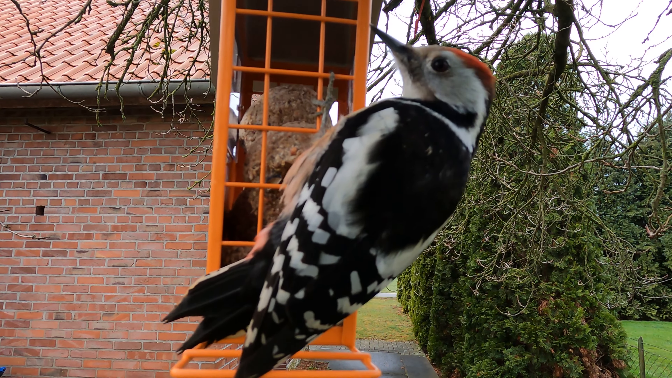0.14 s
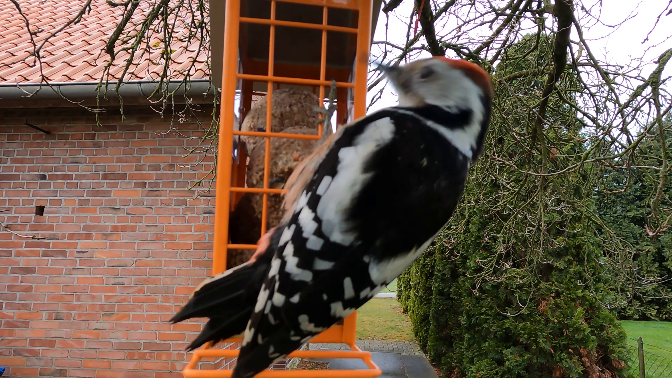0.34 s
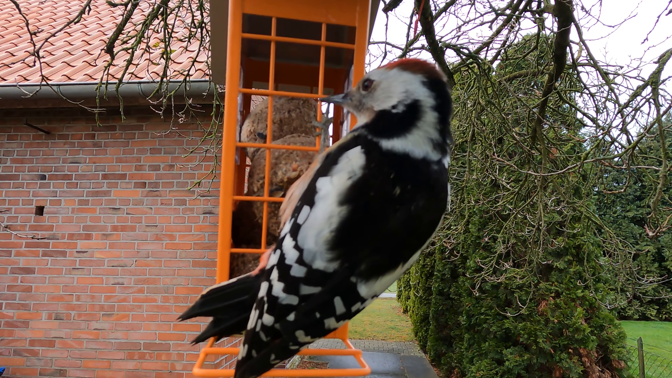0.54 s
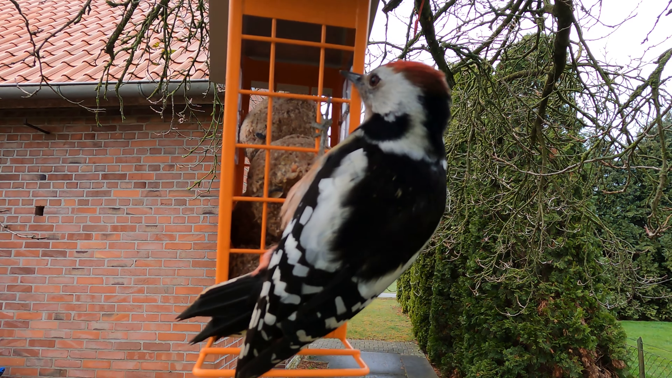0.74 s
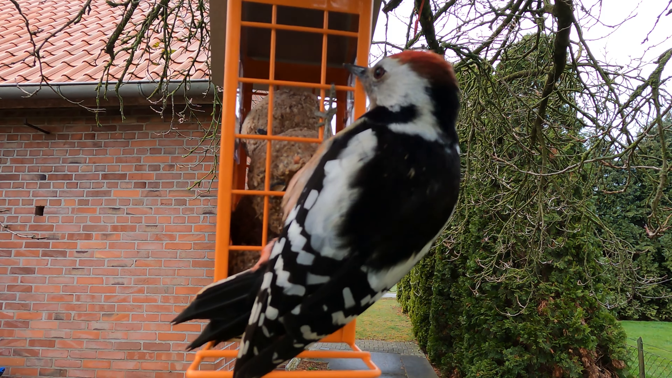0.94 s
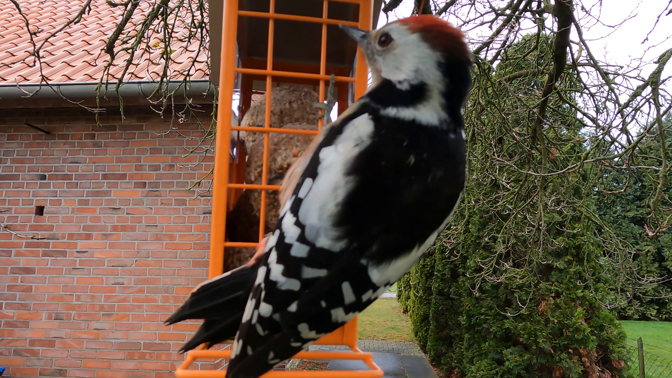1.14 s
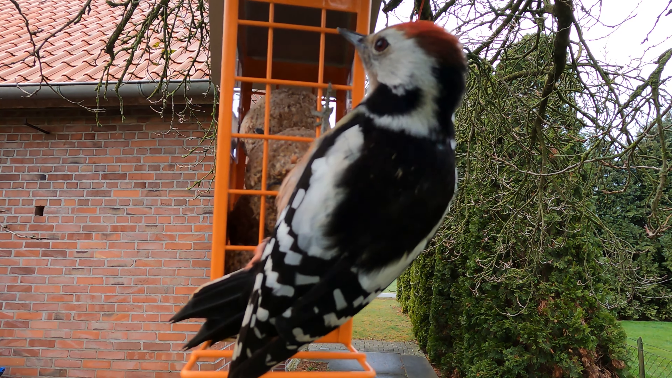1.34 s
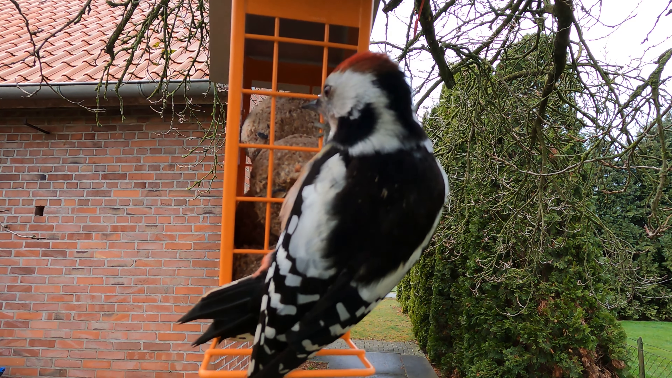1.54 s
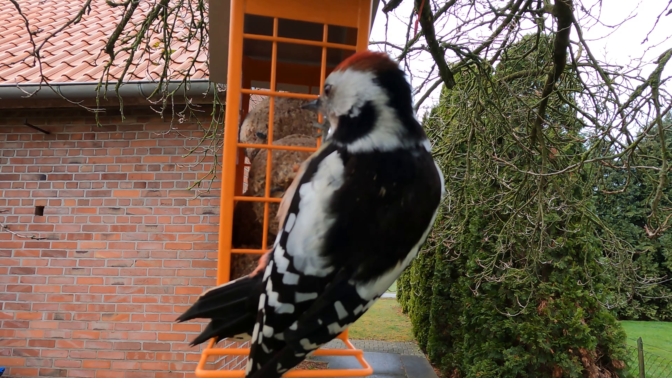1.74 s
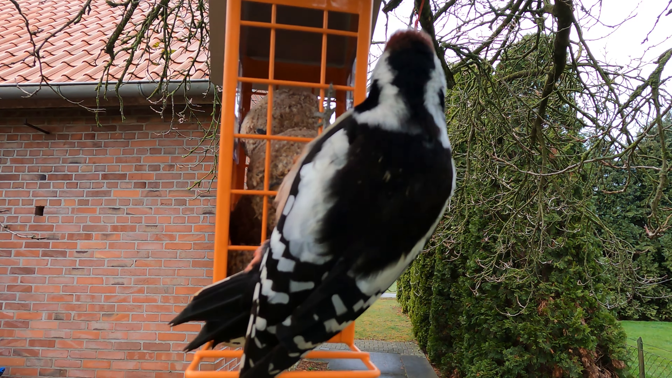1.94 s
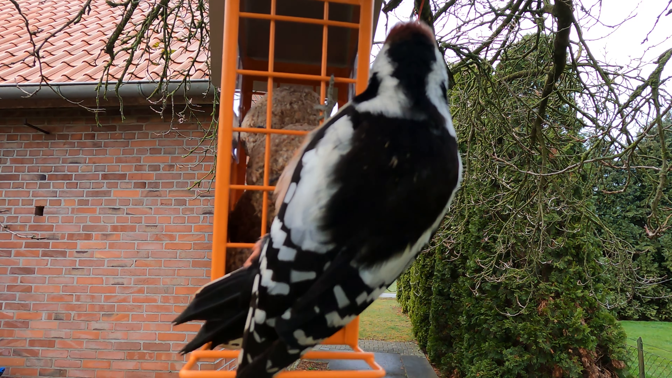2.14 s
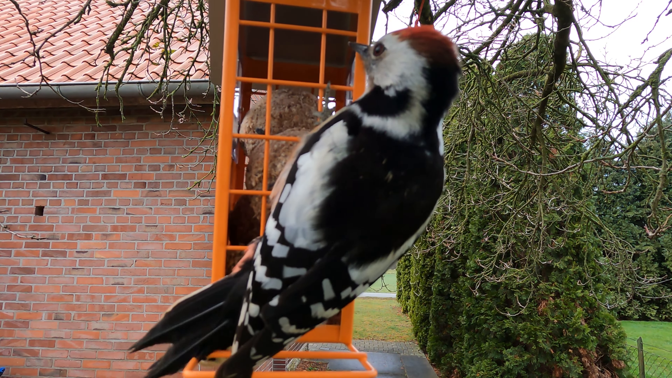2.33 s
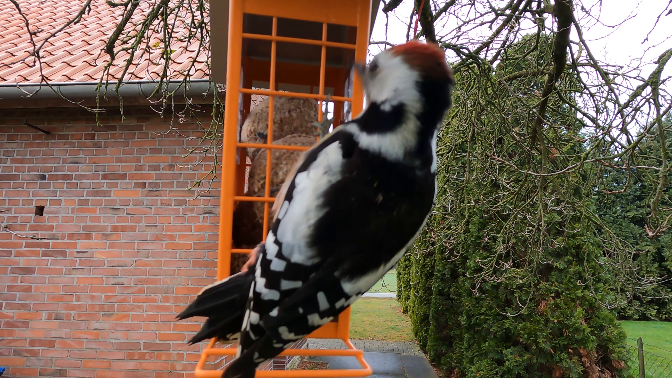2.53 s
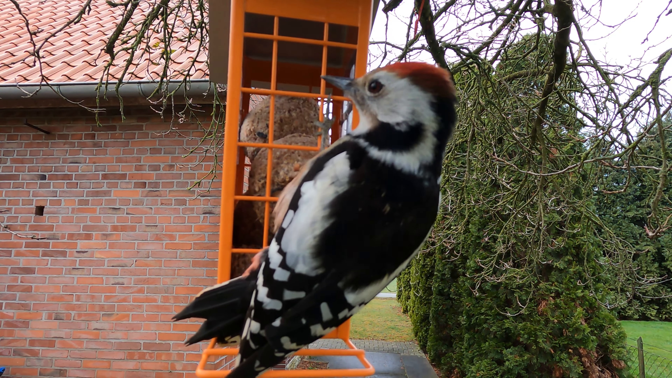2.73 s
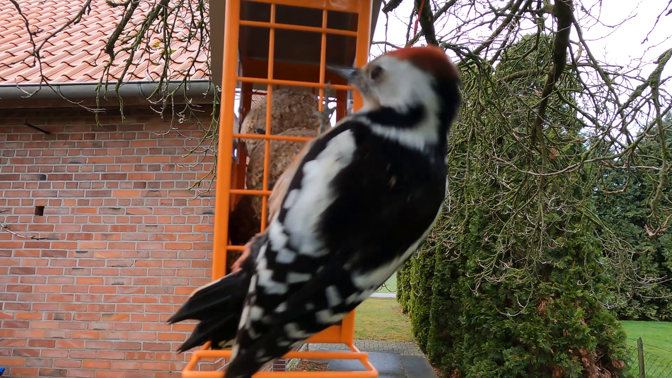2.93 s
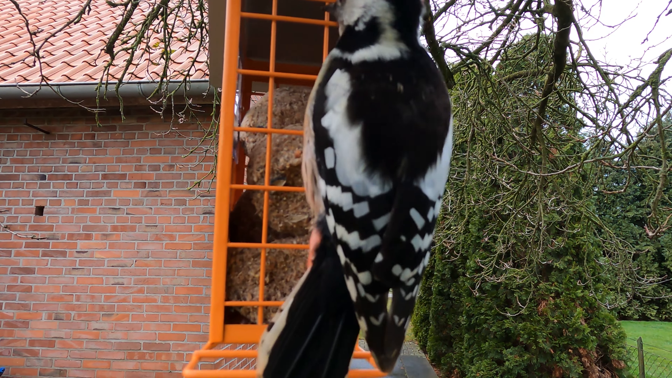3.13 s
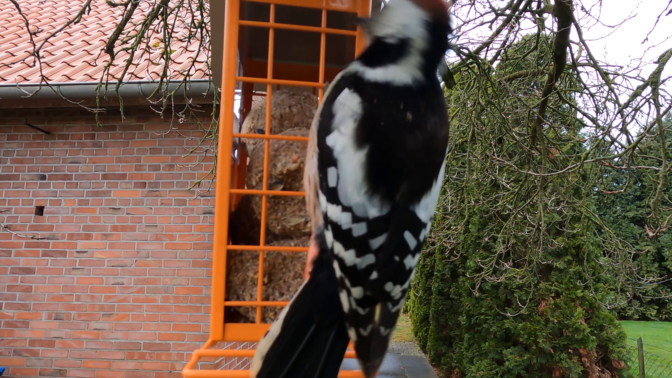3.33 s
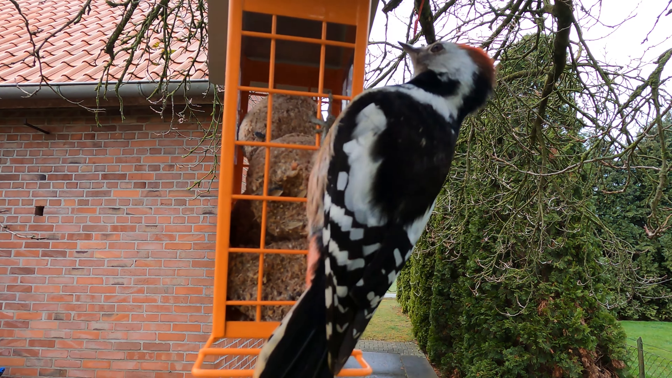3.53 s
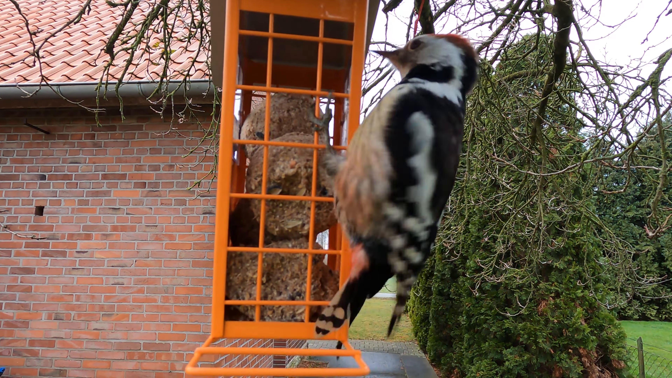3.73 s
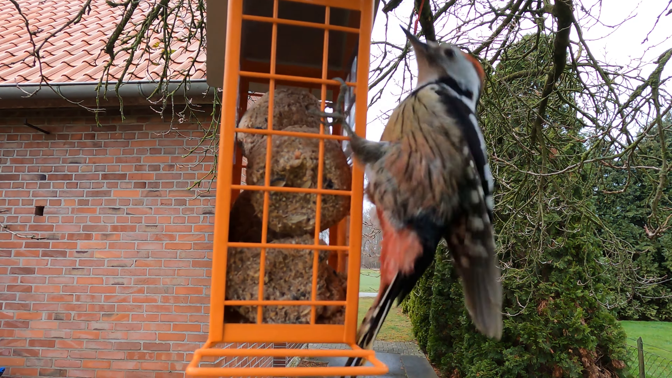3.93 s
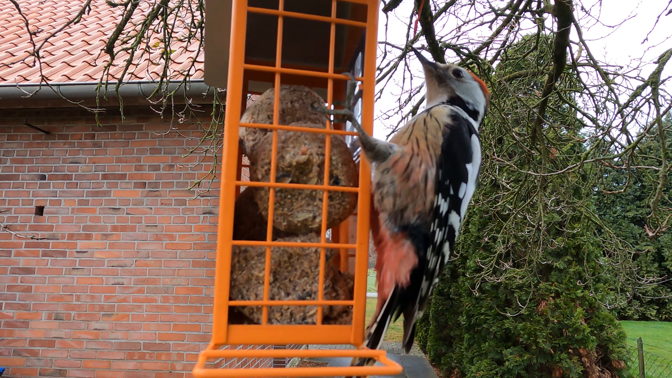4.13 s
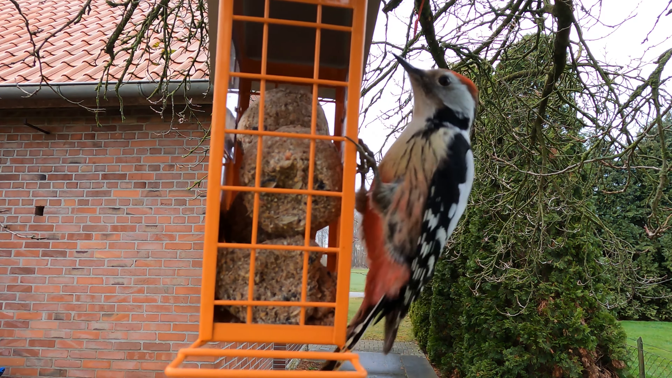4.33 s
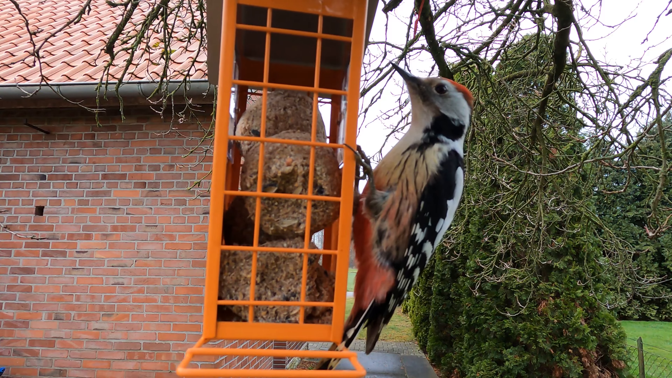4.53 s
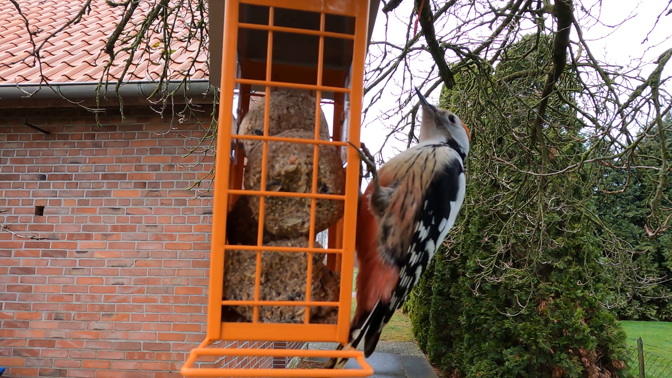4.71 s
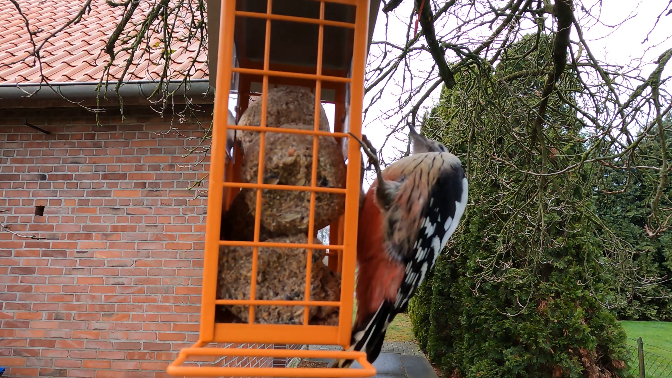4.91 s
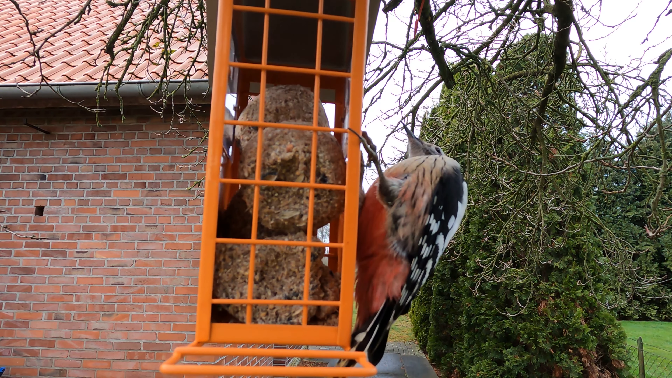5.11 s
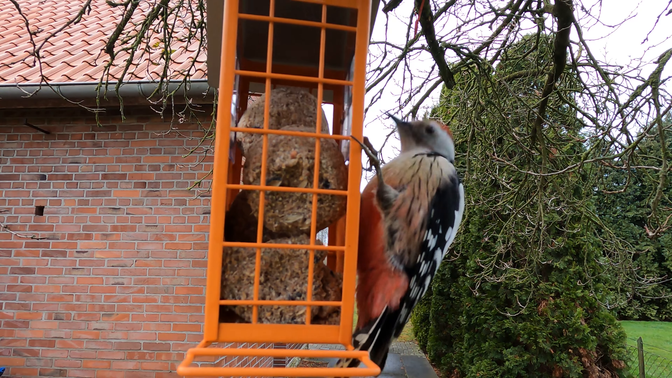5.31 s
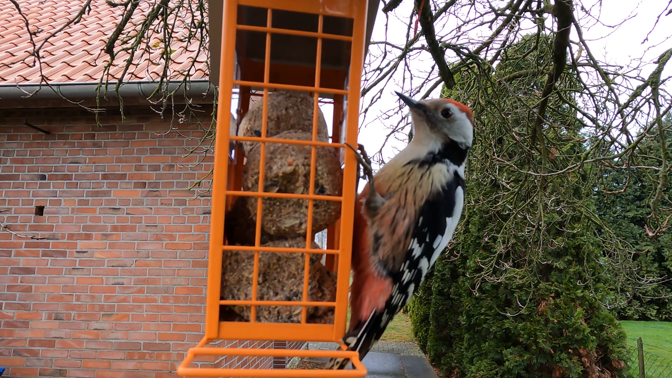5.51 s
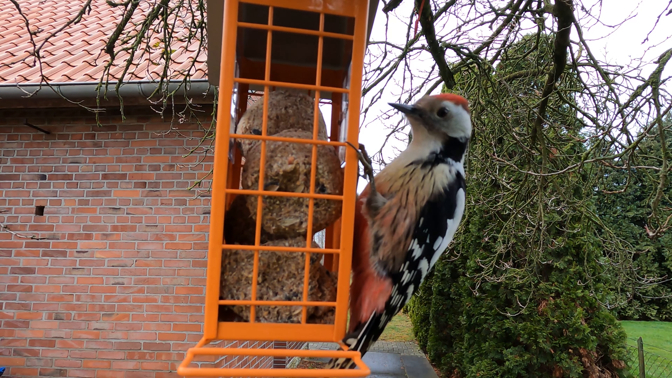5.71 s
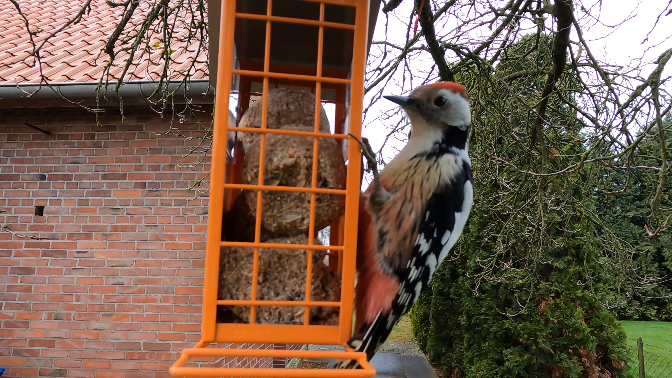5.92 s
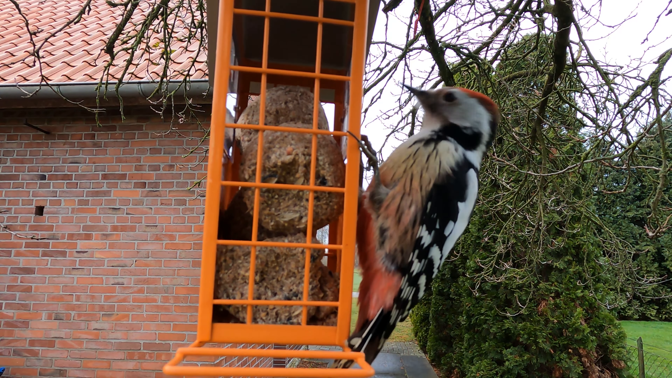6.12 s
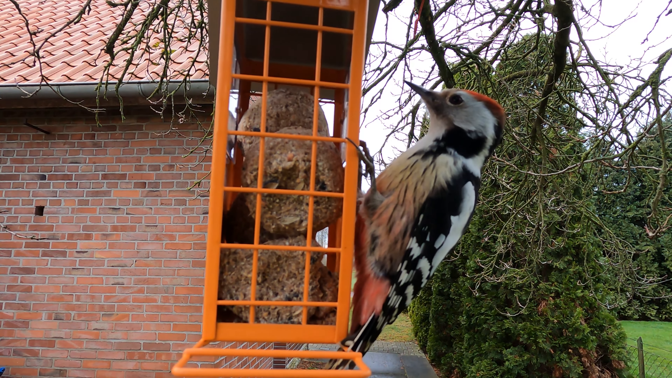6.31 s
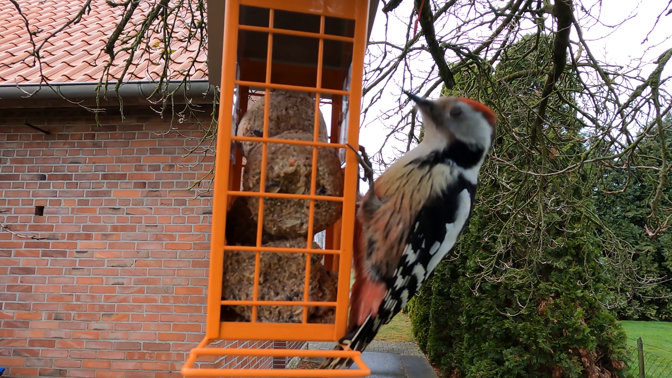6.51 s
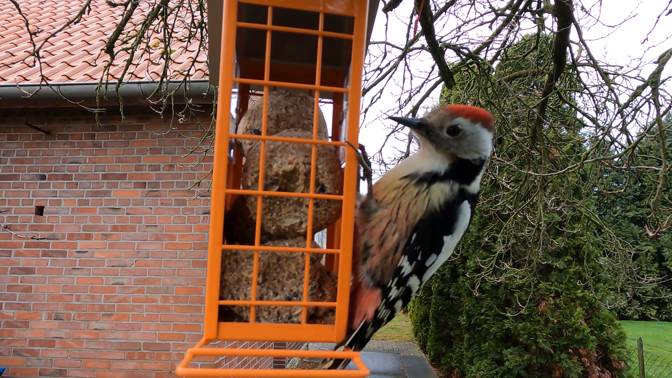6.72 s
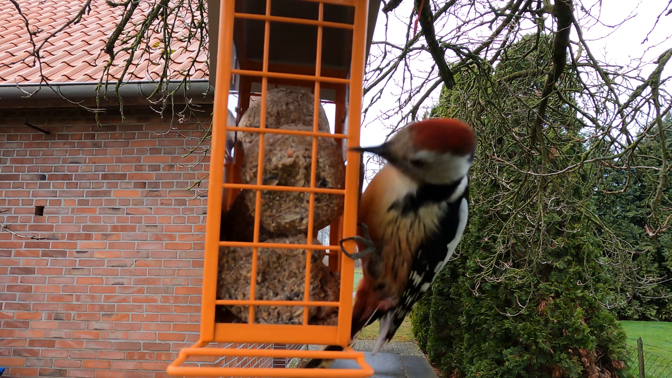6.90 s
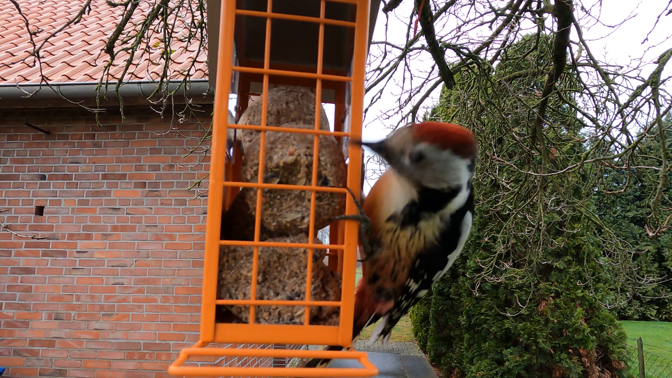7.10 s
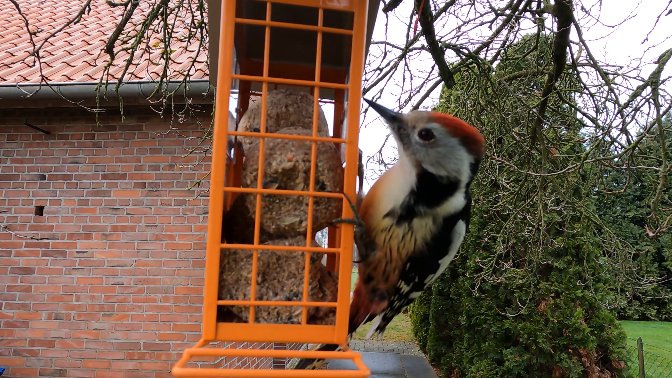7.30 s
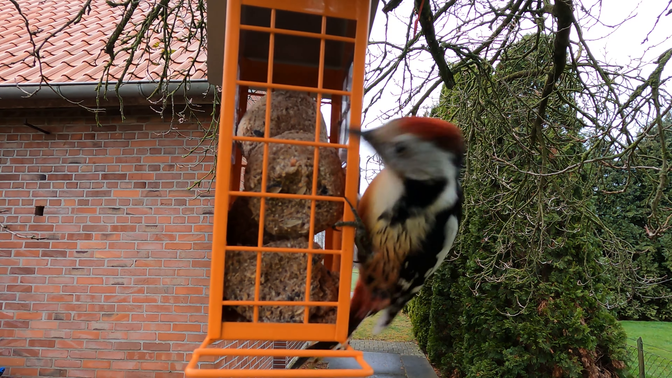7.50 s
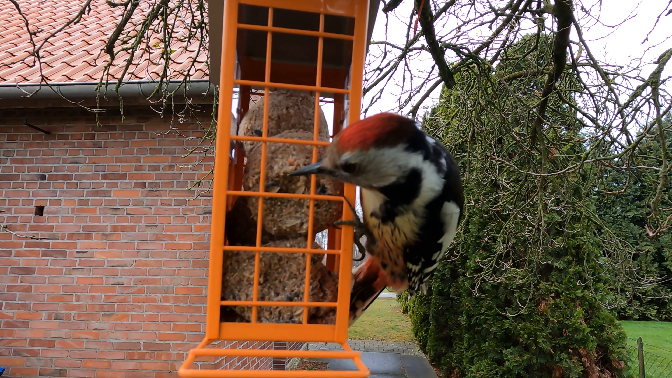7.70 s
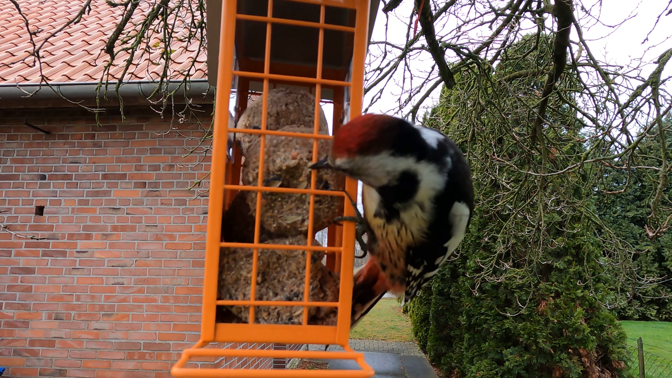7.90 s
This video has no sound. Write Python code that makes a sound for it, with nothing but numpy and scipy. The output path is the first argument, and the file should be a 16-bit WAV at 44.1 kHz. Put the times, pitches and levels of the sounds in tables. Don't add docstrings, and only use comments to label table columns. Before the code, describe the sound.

A woodpecker's beak and claws rattle and knock a wire garden feeder while harsh bird calls, thin whistles and chirps sound over low rumble.

```python
import sys
import numpy as np
from scipy import signal
from scipy.fft import rfft, irfft, next_fast_len
from scipy.io import wavfile
from scipy.ndimage import uniform_filter1d, map_coordinates

SR = 44100
rng = np.random.default_rng(int(sys.argv[2]) if len(sys.argv) > 2 else 0)


def ratio(d):
    e = np.asarray(d, float) / 20
    return 10 ** e


def digitize_waveform(pressure):
    field = np.atleast_2d(pressure).T
    bounded = np.clip(field, -1, 1)
    quanta = np.round(bounded * 32767).astype(np.int16)
    wavfile.write(sys.argv[1], SR, quanta)


N = 350595
T = np.arange(N) / SR

# (frequency [Hz], level [dB], time of a crest [s])
HUM_TONES = [(74.36, -40.5, 0.01073), (64.4, -52, 0.0029), (62, -48.5, 0.013)]
# (frequency [Hz], level [dB per Hz])
RUMBLE_SPECTRUM = [(8.8, -42), (15, -11.5), (43, -8.5), (55, -5.5), (76, -8.5), (90, -15), (103, -16),
                   (350, -43), (460, -80.5), (770, -120)]
TRAFFIC_SPECTRUM = [(140, -25.5), (230, 1), (275, -9), (351, 1.5), (469, -1.5), (650, -8), (900, -11.5),
                    (1170, -42.5), (1980, -120)]
GARDEN_SPECTRUM = [(530, -35.5), (900, -9.5), (1050, -1), (1600, -2), (1950, -5.5), (2600, -6),
                   (3800, -14.5), (5600, -21), (7000, -29), (8000, -35.5), (10000, -39.5), (15500, -45.5)]
# (frequency [Hz], correlation [1])
LIKENESS = [(20, 1), (60, 0.89), (180, 0.53), (550, 0.82), (1650, 0.58), (5000, 0.059), (15000, 0.056)]
# (frequency [Hz], level [dB])
GARDEN_TILT = [(200, -4), (2500, 0.5), (4400, 1), (8000, -5.5), (14000, -9)]
# (time [s], level [dB])
WIND_LEVEL = [
    (0, -59.5),
    (2, -57.5),
    (3.8, -56.5),
    (4.1, -49),
    (4.5, -56.5),
    (5.8, -56),
    (6.3, -53.5),
    (6.9, -51.5),
    (7.2, -56),
    (7.95, -55.5),
]
# (time [s], level [dB])
BUSTLE_LEVEL = [(0, -62), (.3, -65), (1.9, -67), (2.24, -62.5), (2.63, -69.5), (3.21, -63), (3.65, -66.5),
                (4.1, -60.5), (4.98, -64.5), (5.78, -66.5), (6.2, -60.5), (6.7, -69.5), (6.91, -62.5),
                (7.13, -65.5), (7.95, -63)]

# (frequency [Hz], level [dB], t60 [s])
CAGE_MODES = [(364.4, -21, 0.18), (795, -25, 0.96), (891, -14.5, 0.34), (1196, -18.5, 0.12),
              (1254, -6, 0.14), (1620, -37.5, 0.72), (1900, -29, 1), (2220, -24.5, 0.097), (4500, -20, .12),
              (4600, -14, 0.059), (5356, -29.5, 0.18)]
# (frequency [Hz], level [dB], t60 [s])
HOOK_MODES = [(412, -8, 0.46), (518, 3, 0.026), (794, -18.5, 0.69), (1004, -1.5, 0.12), (1560, -6, 0.17)]
# (frequency [Hz], width [Hz], level [dB])
WIRE_PEAKS = [(4000, 61, 5.5), (4580, 340, 10), (4930, 2140, 3.5), (6300, 70, -8), (6410, 270, -2),
              (6350, 44, -8.5), (8560, 44, -22.5)]
# (frequency [Hz], width [Hz], level [dB])
TRAY_PEAKS = [(560, 130, -15.5), (760, 93, -7.5), (1026, 135, -3), (1365, 400, -7), (1800, 107, -4),
              (2134, 300, -7.5)]
# (time [s], level [dB])
HOOK_BUMPS = [(.04, -57), (0.084, -59.5), (3.274, -52), (3.325, -54), (4.046, -70), (4.116, -58),
              (4.2, -66), (4.454, -59.5), (4.66, -53.5), (7.098, -58), (7.924, -57)]
# (time [s], peak level [dB], tray over wire [dB], rattle t60 [s])
PECK_HITS = [
    (2.302, -39, -0.5, 0.069),
    (3.891, -39.5, 4.5, 0.12),
    (4.7391, -49.5, 4.5, 0.059),
    (6.1179, -41, 18.5, 0.029),
    (6.1265, -22.5, 1, 0.057),
    (6.9126, -26, -3.5, 0.096),
    (7.18, -27, -25, 0.056),
]
CLAW_GRIPS = [(2.2966, -31.5, -19, 0.034), (3.063, -42.5, -15, 0.19), (3.1028, -32, -1, 0.012),
              (3.1512, -31, -12.5, 0.11), (3.5964, -45, -23, 0.038), (3.871, -58, 9, 0.11),
              (3.9136, -22, -7.5, 0.069), (3.9274, -28, -1.5, 0.093), (3.9643, -47.5, 4, 0.19),
              (4.0478, -51, 2.5, 0.068), (4.326, -41.5, -17, 0.16), (4.3708, -27.5, -17, 0.077),
              (4.3903, -39, -3.5, 0.09), (4.347, -50.5, -20, .03), (6.1295, -21, -7, 0.035),
              (6.9731, -22, -6, 0.014), (7.2804, -54.5, -19, 0.056), (7.553, -57, -24, 0.018),
              (7.575, -64, -8, 0.018), (7.625, -42, -13, .02)]
WEIGHT_JOLTS = [(1.6324, -61, 10.5, 0.046), (2.4522, -50, -3, 0.051), (3.0908, -33, -5, 0.021),
                (3.13, -36.5, -8, 0.1), (3.1361, -22, -1, 0.028), (3.7814, -43, 0.5, .04),
                (3.9523, -33, 0.5, 0.027), (5.5744, -60, -4, 0.029), (6.4164, -68.5, 3.5, .019),
                (6.9372, -36.5, 0.5, 0.13), (6.9881, -37, -7, 0.036), (7.9253, -37.5, -6, 0.034)]

# (time of top [s], top pitch [Hz], level [dB], rise [s], last pitch over top [1])
HARSH_CALLS = [(0.123, 1630, -76, 0.061, 0.82), (0.802, 1795, -69.5, 0.071, 0.67),
               (1.643, 1545, -57.5, .012, 0.74), (1.847, 1758, -56.5, 0.027, .64),
               (2.062, 1629, -53, 0.056, 0.63), (2.255, 1755, -54, 0.063, 0.54),
               (3.026, 1752, -56.5, 0.033, 0.61), (3.281, 1750, -55.5, 0.031, 0.58),
               (3.548, 1776, -56.5, 0.036, 0.67), (3.62, 1653, -61.5, .02, 0.72),
               (3.8, 1900, -64, 0.029, 0.57), (4.172, 2010, -57.5, 0.059, 0.62),
               (4.499, 2440, -65.5, .015, 1), (4.625, 2400, -60, 0.016, .6), (4.965, 1820, -59, 0.069, .6),
               (5.84, 1723, -61, 0.072, 0.55), (6.017, 1610, -58.5, 0.049, 0.6),
               (6.778, 1802, -47.5, .06, .6), (6.86, 2350, -65, 0.028, 0.52),
               (7.181, 1690, -63, 0.057, 0.78), (7.441, 1620, -67, 0.055, 0.79)]
# (time [s], length [s], first pitch [Hz], last pitch [Hz], level [dB])
THRUSH_SLURS = [(.835, 0.067, 2450, 2550, -63.5), (.885, 0.043, 2700, 2850, -67),
                (.93, 0.083, 2850, 2680, -68.5), (1.0, 0.18, 2640, 2430, -76.5),
                (1.22, .04, 2430, 2620, -73), (1.26, 0.044, 2430, 2640, -61.5),
                (1.365, 0.037, 2850, 2560, -68), (1.4, 0.098, 2620, 2530, -74.5), (.1, .2, 4080, 2850, -78),
                (.25, .06, 1500, 1750, -81), (2.53, 0.076, 3413, 2290, -70),
                (3.342, 0.012, 5400, 6070, -82), (3.358, 0.019, 6050, 4950, -75),
                (3.378, 0.02, 4950, 4630, -72), (4.17, 0.085, 2460, 3640, -64),
                (4.225, 0.026, 2900, 1800, -60), (4.345, 0.057, 2040, 2600, -59.5),
                (5.06, 0.046, 2600, 2480, -69), (5.06, .13, 1520, 1675, -71.5),
                (5.46, 0.039, 3000, 2400, -77), (5.48, 0.083, 2330, 2590, -75),
                (5.56, 0.087, 2560, 2420, -78), (5.63, .03, 2380, 2280, -79),
                (5.66, 0.065, 2600, 3140, -72), (5.69, 0.12, 1650, 1777, -66),
                (6.15, 0.17, 1780, 1980, -75), (6.32, 0.053, 2050, 2090, -66),
                (6.24, 0.19, 1580, 1787, -68.5), (6.8, 0.12, 1560, 1727, -60),
                (7.24, 0.048, 1150, 1380, -73.5), (7.3, 0.16, 1450, 2090, -72),
                (7.07, .04, 5100, 4600, -74), (7.5, 0.041, 2050, 1720, -66),
                (7.265, 0.076, 4300, 3800, -75), (7.73, .045, 5200, 5130, -88),
                (7.82, 0.036, 5200, 5200, -81), (7.77, 0.085, 3350, 3570, -72)]
# (time [s], length [s], pitch [Hz], level [dB])
HELD_WHISTLES = [(1.298, 0.14, 3110, -79), (1.86, 0.039, 4150, -84), (2.147, 0.044, 4130, -79),
                 (2.417, .09, 4120, -87), (2.46, 0.14, 3510, -78.5), (2.578, 0.12, 2220, -76),
                 (3.449, .02, 5600, -71), (3.476, 0.18, 5630, -78.5), (3.58, 0.017, 4200, -60),
                 (3.63, 0.018, 4250, -57), (3.66, 0.068, 4200, -70.5), (4.382, 0.05, 3040, -57.5),
                 (5.054, 0.17, 3010, -75), (5.358, 0.13, 3000, -71), (6.303, .09, 1584, -67.5),
                 (6.633, 0.061, 4144, -83.5), (6.992, 0.072, 1690, -72), (7.391, 0.14, 2060, -69.5),
                 (7.845, 0.087, 8100, -86), (7.417, 0.067, 1650, -65), (7.419, 0.045, 3650, -70),
                 (7.838, 0.068, 5730, -84)]
# (center time [s], level [dB])
MAGPIE_SYLLABLES = [
    (0.418, -55.5),
    (.479, -53.5),
    (0.55, -51.5),
    (0.635, -51),
    (0.738, -53.5),
]
# (frequency [Hz], width [Hz], level [dB])
BEAK_PEAKS = [(1280, 140, -14.5), (1900, 190, -3.5), (2680, 270, -4)]
# (center time [s], level [dB],
# half length [s])
RUSTLES = [(.79, -80, 0.032), (1.63, -67, 0.034), (2.3, -61, 0.057), (2.46, -72, 0.043),
           (3.1, -62.5, 0.095), (3.17, -79, 0.01814), (3.47, -77, 0.12), (3.8, -57.5, 0.049),
           (3.93, -50, 0.057), (4.03, -59.5, 0.05), (4.36, -64.5, 0.08), (4.52, -73, 0.062),
           (5.03, -69, 0.098), (5.38, -74.5, 0.14), (6.15, -62, 0.067), (6.78, -62, 0.072),
           (6.94, -65, 0.065), (7.18, -67.5, 0.11), (7.43, -71, 0.05), (7.65, -61.5, 0.08)]
# (frequency [Hz], level [dB])
FEATHER_SPECTRUM = [(600, -25.5), (1500, -8), (3000, -3), (5000, -3.5), (8000, -15.5), (11000, -22.5),
                    (15500, -38.5)]
# (time [s], top pitch [Hz], level [dB], end of plunge after start [s], plunge over pitch [1])
TIT_NOTES = [(1.102, 8480, -74, 0.12, 0.11), (1.273, 8290, -70.5, 0.11, 0.067),
             (2.728, 7470, -61, .12, 0.16), (3.63, 7800, -83, 0.047, .06), (3.79, 7230, -67.5, 0.047, 0.18),
             (4.13, 8320, -68, 0.09, .11), (4.41, 8000, -57.5, 0.039, 0.14),
             (4.552, 8220, -63.5, 0.12, 0.055), (5.079, 7520, -77, .066, .03),
             (5.08, 9750, -87, 0.092, .03), (5.223, 6700, -70, 0.061, .32),
             (5.225, 9260, -82, 0.064, 0.0363), (7.095, 6930, -62, 0.11, 0.041)]
# (center time [s], level [dB], half length [s])
WING_BEATS = [
    (3.1, -30.5, 0.026),
    (3.9, -42, 0.12),
    (3.988, -30, 0.03),
    (4.22, -52.5, 0.08),
]
# (time [s], pitch [Hz], level [dB])
SCOLD_PITCH = [
    (7.626, 1074, -59.5),
    (7.669, 1310, -54),
    (7.683, 1600, -50.5),
    (7.707, 1354, -57.5),
    (7.742, 1352, -60),
    (7.769, 1004, -62),
]
SCOLD_OVERTONES = [-4.5, 2, 1.5, -19]

# (frequency [Hz], t60 [s])
WALL_T60 = [(300, 0.12), (2000, 0.14), (9000, 0.15)]
# (frequency [Hz], level [dB])
LEFT_SHADE = [(300, -2.5), (2800, -2), (3500, -16), (5000, -29), (12000, -30)]
# (frequency [Hz], level [dB])
MIC_RESPONSE = [(20, -1), (10500, -0.5), (12000, -12), (14500, -11.5), (16000, -44.5)]


def unit(x):
    return x / np.sqrt(np.mean(x ** 2) + 1e-20)


def along(points, hz):
    f, v = np.transpose(points)
    return np.interp(np.log(hz + 1), np.log(f + 1), v)


def curves(rows, t=T):
    s, *cols = np.transpose(rows)
    return [np.interp(t, s, c) for c in cols]


def wobble(rate_hz, size=N):
    knots = rng.standard_normal(int(size * rate_hz / SR) + 4)
    return map_coordinates(knots, [np.arange(size) * rate_hz / SR])


def filtered(x, response):
    m = next_fast_len(x.shape[-1] + 8192)
    return irfft(rfft(x, m) * response(np.fft.rfftfreq(m, 1 / SR)), m)[..., :x.shape[-1]]


def resonances(peaks):
    def response(f):
        total = 0
        for k, (center_hz, width_hz, db) in enumerate(peaks):
            damping = 1j * f * width_hz
            total = total + (-1) ** k * ratio(db) * damping / (center_hz ** 2 - f * f + damping)
        return total
    return response


def swells(rows):
    return sum(ratio(db) * np.exp(-((T - s) / half_s) ** 2) for s, db, half_s in rows)


def bell(modes, t):
    hz, db, t60_s = np.transpose(modes)[:, :, None]
    decay = ratio(db - 60 * t / np.clip(t60_s, .02, 1.3))
    return decay * np.sin(2 * np.pi * hz * t) * (1 - np.exp(-t / 0.00056))


def sing(calls, voice, fade_s):
    out = np.zeros(N)
    for rows in calls:
        a, b = round(rows[0][0] * SR), round(rows[-1][0] * SR)
        t = T[a:b]
        hz, db = curves(rows, t)
        edge = np.clip(np.minimum(t - T[a], T[b] - t) / fade_s, 0, 1)
        out[a:b] += edge * ratio(db) * voice(hz)
    return out


def whistle(hz):
    size = len(hz)
    hz = hz * (1 + 0.0085 * wobble(200, size))
    return np.sqrt(2) * ratio(3.35 * wobble(70, size)) * np.sin(2 * np.pi * np.cumsum(hz) / SR)


def rush(spectrum, patchy_db):
    z = signal.stft(rng.standard_normal((2, N + 512)), nperseg=512)[2]
    field = uniform_filter1d(rng.standard_normal(z.shape[1:]), size=6, axis=0)
    field = uniform_filter1d(field, size=14, axis=1)
    pair = signal.istft(z * ratio(patchy_db * unit(field)), nperseg=512)[1][:, :N]

    def mid_side(hz):
        angle = np.arccos(np.clip(along(LIKENESS, hz), -1, 1)) / 2
        return ratio(along(spectrum, hz)) * np.array([np.cos(angle), np.sin(angle)])

    mid, side = filtered(pair, mid_side)
    return unit(np.array([mid + side, mid - side]))


def background():
    hum = np.zeros(N)
    for hz, db, crest_s in HUM_TONES:
        hum += np.sqrt(2) * ratio(db + 0.12 * wobble(3.1)) * np.cos(2 * np.pi * hz * (T - crest_s))
    (wind_db,), (bustle_db,) = curves(WIND_LEVEL), curves(BUSTLE_LEVEL)
    traffic_db = -66 + bustle_db - bustle_db.mean()
    rumble = ratio(wind_db + 9.5 + 1.4 * wobble(5.1)) * rush(RUMBLE_SPECTRUM, patchy_db=1.5)
    traffic = ratio(traffic_db) * rush(TRAFFIC_SPECTRUM, patchy_db=4.0)
    garden = ratio(bustle_db + 2.0 + 1.06 * wobble(4.587)) * rush(GARDEN_SPECTRUM, patchy_db=3.0)
    garden = filtered(garden, lambda hz: ratio(np.array([along(GARDEN_TILT, hz), 0 * hz])))
    return hum * ratio([[-.3], [.3]]) + rumble + traffic + garden


def cage():
    t = np.arange(SR * 4 // 5) / SR
    short = t[:SR // 6]
    ring, wire, tray, mount = np.zeros((4, N + len(t)))
    cage_bells, hook_bells = bell(CAGE_MODES, t), bell(HOOK_MODES, t)
    kinds = [(PECK_HITS, -18, -9.5), (CLAW_GRIPS, -30, -18.5), (WEIGHT_JOLTS, -1.3, -24)]
    for contacts, thump_db, ring_db in kinds:
        for s, db, tray_db, t60_s in contacts:
            i = round(s * SR)
            t60_s = max(t60_s, .005)
            rough_db = 2.6 * np.tanh(wobble(500, size=len(short)))
            burst_db = 7 * np.exp(-(short / (0.19 * t60_s)) ** 4) - 5.5
            rattle = rng.standard_normal((2, len(short)))
            rattle *= ratio(-60 * short / t60_s + rough_db + burst_db)
            wire[i:i + len(short)] += ratio(db - 6.5) * rattle[0]
            tray[i:i + len(short)] += ratio(db + tray_db + 10.5) * rattle[1]
            mount[i] += ratio(db + thump_db + 32)
            mode_db = db + tray_db + ring_db + rng.normal(0, 0.94, len(CAGE_MODES))
            ring[i:i + len(t)] += ratio(mode_db) @ cage_bells
    for s, db in HOOK_BUMPS:
        i = round(s * SR)
        ring[i:i + len(t)] += ratio(db + rng.normal(0, 2.4, len(HOOK_MODES))) @ hook_bells
    mount = filtered(mount, lambda f: 1 / (1 + 1j * f / 220) ** 2)
    thump = filtered(ratio(4.0) * mount, resonances([(165.4, 120, 5.5), (302.0, 37, -34.5)]))
    scrape = filtered(wire, resonances(WIRE_PEAKS))
    knock = filtered(tray, resonances(TRAY_PEAKS))
    return (ring + thump + scrape + knock)[:N]


def squawks():
    second_ratio, second_db = 1.4, -1.5
    out = np.zeros(N)
    for s, top_hz, db, rise_s, end in HARSH_CALLS:
        height = top_hz / 1750
        fall_s = .078 * height ** 2
        hoarse = (.6 - .022 * (db + 57)) * height ** 3
        deep = min(rise_s / .06, 1)
        t = np.arange(round((rise_s + fall_s) * SR)) / SR
        size = len(t)
        # (time [s], pitch over top [1], beak resonance [Hz], level [dB], strain [1])
        shape = [(0, 1 - .32 * deep, 3600, -7, 1),
                 (.8 * rise_s, 1 - .18 * deep, 3300 + 1.5e4 * rise_s, -5, 1),
                 (rise_s, 1, 2.1 * top_hz, 0, .7),
                 (rise_s + .35 * fall_s, .62 + .38 * end, 1.75 * top_hz, -5, .62),
                 (rise_s + .9 * fall_s, .08 + .92 * end, 1.33 * top_hz, -10, .62),
                 (rise_s + fall_s, end, 1.27 * top_hz, -25, .62)]
        pitch, beak_hz, swell_db, strain = curves(shape, t)
        hz = top_hz * pitch * (1 + .1 * hoarse * strain * wobble(350, size))
        phase = 2 * np.pi * np.cumsum(hz) / SR
        chest = np.clip(.055 * (db + 59), .08, .45)

        def gain(k):
            beak = 1 / (1 + ((k * top_hz * pitch - beak_hz) / 850) ** 4)
            return beak + chest * (1.5 * (k == 1) + .4 * (k == 3)) + .35 * (k == 2)

        tone = np.zeros(size)
        for k in range(1, 5):
            tone += gain(k) * ratio(3.25 * wobble(137.0, size)) * np.sin(k * phase)
        climbing = np.clip((rise_s - t) / 0.0085, 0, 1)
        for k in second_ratio * np.arange(1, 4):
            tone += ratio(second_db) * climbing * gain(k) * np.sin(k * phase)
        flutter = 1 + 0.22 * hoarse * np.sin(2 * np.pi * 95 * (t - rise_s + 0.0046))
        breath = wobble(2600, size) * np.sin(2 * np.pi * np.cumsum(1.2 * beak_hz) / SR)
        a = round((s - rise_s) * SR)
        out[a:a + size] += ratio(db + swell_db) * (tone + 0.41 * hoarse * strain * breath) * flutter
    return out


def thrush():
    slurs = [*THRUSH_SLURS, *[(s, long_s, hz, hz, db) for s, long_s, hz, db in HELD_WHISTLES]]
    calls = []
    for s, long_s, from_hz, to_hz, db in slurs:
        peak_hz = from_hz + 0.64 * (to_hz - from_hz)
        calls.append([(s, from_hz, db + 1), (s + 0.47 * long_s, peak_hz, db), (s + long_s, to_hz, db - 3)])
    return sing(calls, whistle, fade_s=0.0073)


def magpie():
    rasp = rng.standard_normal(N) * ratio(2.3 * wobble(158.8))
    voiced = filtered(rasp, resonances(BEAK_PEAKS))
    voiced = filtered(voiced, lambda f: (f > 900) / (1 + (f / 3400) ** 6))
    return swells([(s, db, 0.016) for s, db in MAGPIE_SYLLABLES]) * unit(voiced)


def feathers():
    grains = rng.standard_normal(N) * ratio(1.7 * wobble(300) + 4.3 * wobble(45))
    return swells(RUSTLES) * unit(filtered(grains, lambda f: ratio(along(FEATHER_SPECTRUM, f))))


def tits():
    calls = []
    for s, hz, db, hold_s, plunge in TIT_NOTES:
        sag = 0.66 * hold_s
        calls.append([(s, 0.98 * hz, db - 11),
                      (s + 0.0059, hz, db - 12.5),
                      (s + 0.86 * hold_s, (1 - 0.76 * sag) * hz, db),
                      (s + 0.92 * hold_s, (1 - sag) * hz, db),
                      (s + hold_s, (1 - sag - plunge) * hz, db + 1.0)])
    return sing(calls, whistle, fade_s=0.0027)


def wings():
    puffs = filtered(rng.standard_normal((3, N)), lambda f: f / (f + 20) / (1 + (f / 70) ** 2))
    puffs = puffs / np.sqrt(np.abs(uniform_filter1d(puffs ** 2, size=1500, axis=1)) + 1e-9)
    return swells(WING_BEATS) * (ratio(-6.5) * puffs[0] + ratio([[-9], [-6]]) * puffs[1:])


def scold():
    def voice(hz):
        size = len(hz)
        hz = uniform_filter1d(hz, size=400) * (1 + 0.013 * wobble(153, size))
        phase = 2 * np.pi * np.cumsum(hz) / SR
        return sum(ratio(db + 2.4 * wobble(77, size)) * np.sin(k * phase)
                   for k, db in enumerate(SCOLD_OVERTONES, 1))

    second = [(s, 1.4 * hz, db - 1.5) for s, hz, db in SCOLD_PITCH[:2]]
    return sing([SCOLD_PITCH, second], voice, fade_s=0.0046)


def walls(x):
    hz, t, z = signal.stft(rng.standard_normal((2, SR // 2)), SR, nperseg=256)
    decay = ratio(-60 * t / along(WALL_T60, hz)[:, None])
    tail = signal.istft(z * decay, SR, nperseg=256)[1]
    late = np.pad(x, (400, 0))[None]
    return signal.fftconvolve(late, tail / np.linalg.norm(tail[0]), axes=1)[:, :N]


def ports(pair):
    def response(hz):
        left = ratio(along(LEFT_SHADE, hz)) * np.exp(-2j * np.pi * hz * 5.64 / SR)
        return np.array([left, 1 + 0 * hz])
    return filtered(pair, response)


def scene():
    near = cage() + feathers()
    far = squawks() + thrush() + tits() + scold()
    chatter = magpie()
    slap = np.pad(far, (round(0.027 * SR), 0))[:N]
    echoes = walls(ratio(-9.5) * near + ratio(2) * far + ratio(-8.0) * chatter)
    heard = ratio(7.0) * (near + far + chatter) + ratio(-14) * slap + echoes
    return ports(heard) + wings() + background()


def top_cut(x):
    return signal.sosfilt(signal.butter(12, 15680, fs=SR, output="sos"), x)


def record(dry):
    mix = filtered(dry, lambda hz: ratio(along(MIC_RESPONSE, hz)))
    return top_cut(mix)


dry = scene()
out = record(dry)
digitize_waveform(out)
```